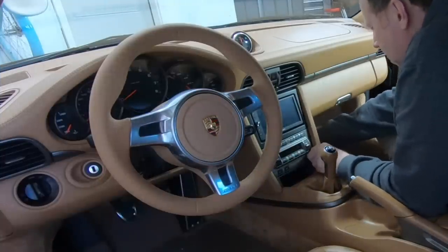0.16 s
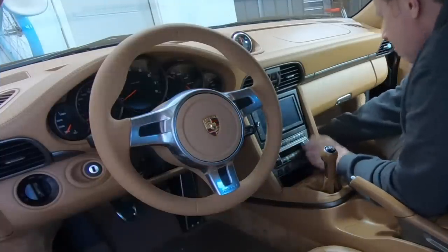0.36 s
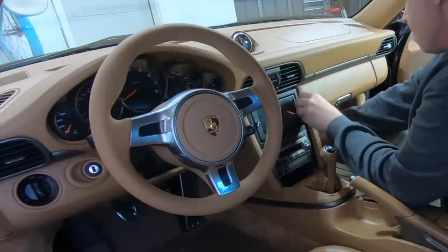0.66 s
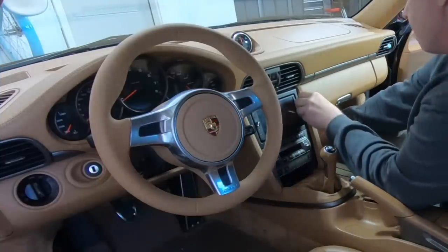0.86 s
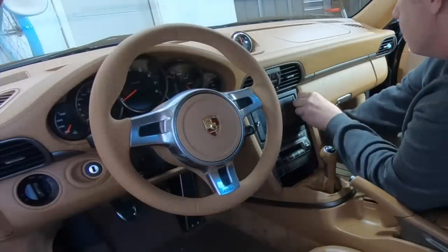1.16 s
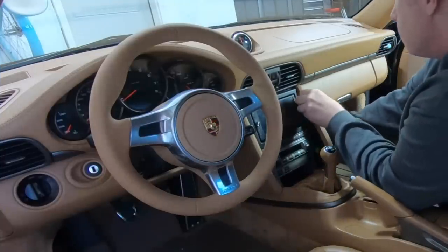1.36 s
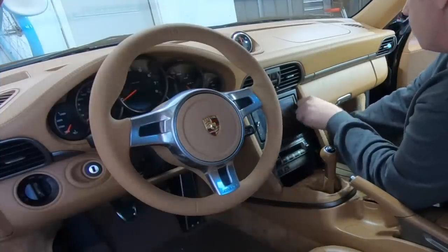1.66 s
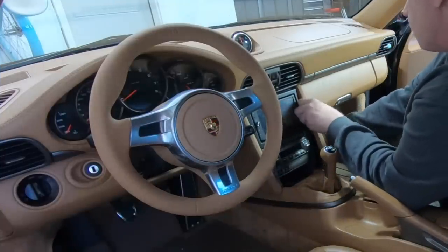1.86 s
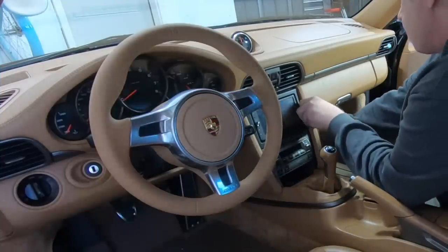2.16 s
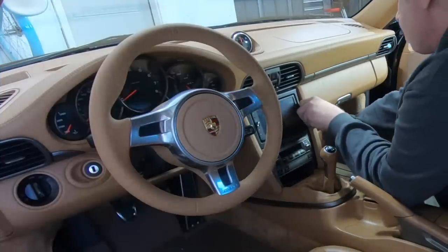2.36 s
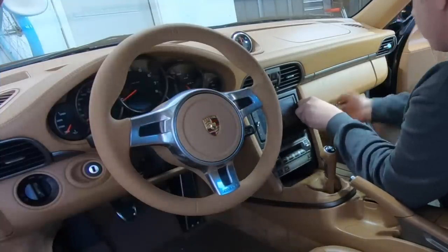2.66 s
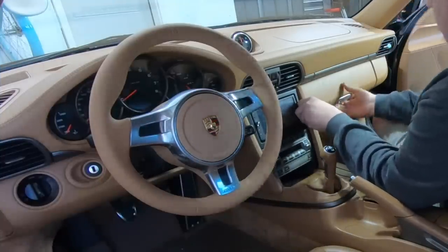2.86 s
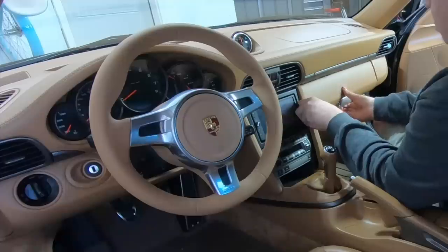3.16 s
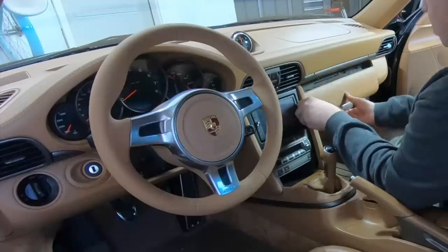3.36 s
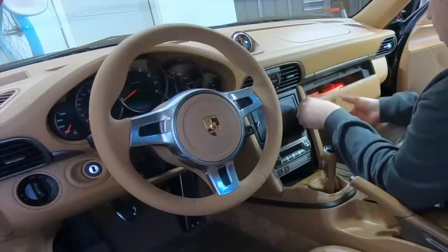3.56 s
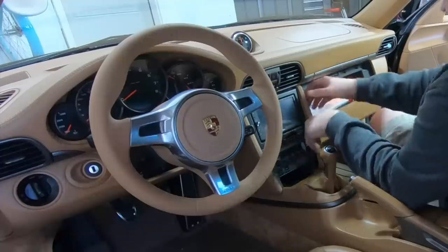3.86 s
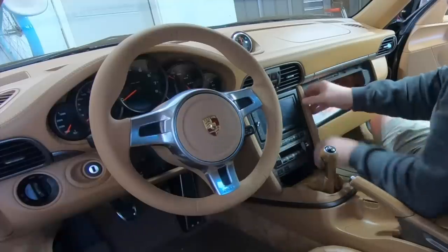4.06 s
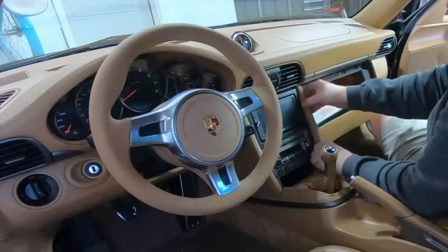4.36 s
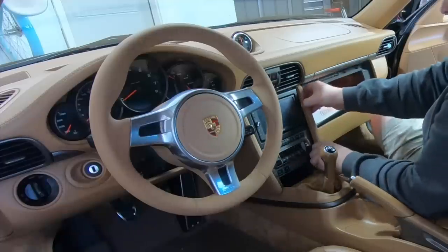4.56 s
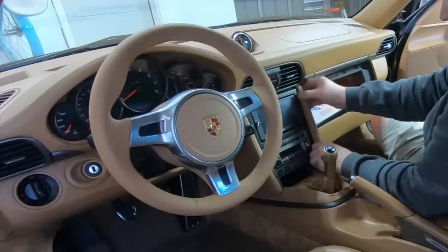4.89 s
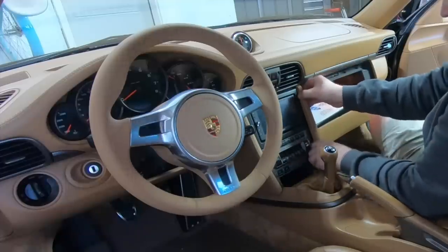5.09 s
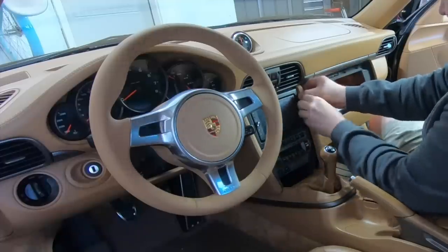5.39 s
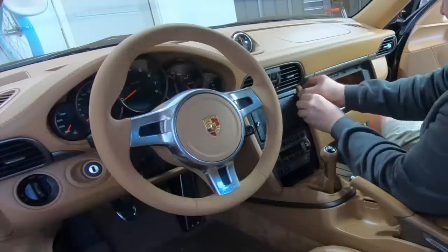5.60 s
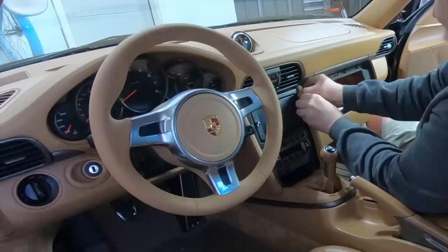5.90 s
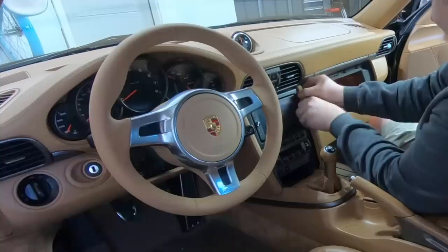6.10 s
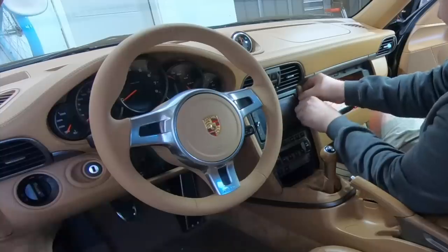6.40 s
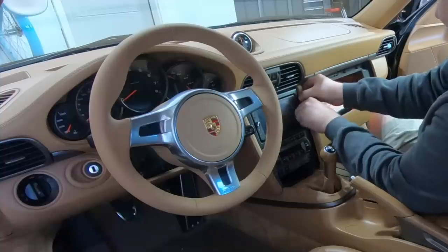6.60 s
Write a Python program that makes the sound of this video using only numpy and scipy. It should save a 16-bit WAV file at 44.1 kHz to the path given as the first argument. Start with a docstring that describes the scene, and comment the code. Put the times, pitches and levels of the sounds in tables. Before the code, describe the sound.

Clips crack and thud as hands work a car's dashboard panel loose, over low wobbling mount rumble, with echoes in a garage.

```python
"""Hands pry a plastic trim panel loose inside a car parked in a garage, doors open. First the camera
mount shivers on its spring, a wavering tone near 70 Hz mostly at right, and single clips knock and crack
(noise bursts through resonances). A flurry of snaps and creaks (stick-slip clicks) follows at 1.1-1.3 s,
the heaviest snap at 3.4 s, lighter clicks and rubs to the end. Throughout, sleeves hiss, shoves ring the
dashboard, the car rocks (low noise), still air murmurs, and the garage echoes (sparse decaying taps)."""
import sys
import numpy as np
from scipy import signal
from scipy.fft import rfft, irfft, next_fast_len
from scipy.io import wavfile
from scipy.ndimage import uniform_filter1d

SR = 44100
rng = np.random.default_rng(int(sys.argv[2]) if len(sys.argv) > 2 else 0)


def transcribe(signal):
    """Save signal, clipped to [-1, 1], as a 16-bit WAV file at the path in sys.argv[1]."""
    frames = np.atleast_2d(signal).T
    limited = np.clip(frames, -1, 1)
    pcm = np.round(limited * 32767).astype(np.int16)
    wavfile.write(sys.argv[1], SR, pcm)


def convert_level_to_amplitude(level_db):
    """Map a level in decibels to its linear amplitude factor."""
    exponent = np.asarray(level_db, float) / 20
    return 10 ** exponent


N = 297234

# clips and knocks: (time [s], knock level [dB], crack level [dB], knock pitch [Hz], left over right [dB])
CLIP_SNAPS = [(0.099, -27, -28.5, 1564, -1), (0.322, -42.5, -55.5, 1655, 0), (0.412, -38.5, -67.5, 634, 4),
              (0.654, -44.5, -50.5, 1400, -5), (0.727, -35, -43, 654, -5), (0.987, -51, -78, 706, -7),
              (1.116, -27, -44, 557, -3), (1.137, -17, -26, 464, 2.5), (1.283, -28, -25.5, 2470, -19.5),
              (1.29, -24.5, -21.5, 458, 26), (1.306, -18.5, -16.5, 686, -15), (1.315, -26, -36, 2350, 9),
              (1.72, -44, -41, 3120, 0), (1.841, -42, -72, 485, 0), (1.897, -58, -54, 510, -16),
              (1.922, -51, -48.5, 527, 9), (1.993, -33.5, -45.5, 737, -2.5), (2.108, -32, -45.5, 460, -0.5),
              (2.131, -48.5, -63, 2096, -4), (2.192, -46.5, -75, 1890, -4),
              (2.405, -43.5, -48.5, 1154, 2.5), (2.708, -40.5, -46.5, 1360, 1),
              (2.932, -38.5, -52.5, 1200, 2), (2.973, -38.5, -61.5, 530, -1), (3.158, -69.5, -50.5, 886, 1),
              (3.247, -68.5, -57.5, 896, 1), (3.264, -58, -52.5, 468, -1), (3.279, -71, -54, 901.7, -1),
              (3.289, -76.5, -48.5, 896, 1), (3.309, -69, -50.5, 891, -4), (3.325, -28, -46.5, 470, -1.5),
              (3.395, -33.5, -42, 1300, 0), (3.41, -5, -5.5, 1252, -1), (3.415, -4.5, -38.5, 635, -3.5),
              (3.873, -25.5, -33, 3400, -4), (4.097, -47.5, -57, 644, -19),
              (4.256, -50, -51.5, 482.4, -1.5), (4.498, -57.5, -54.5, 425, 1),
              (4.72, -45.5, -40.5, 3280, 11), (5.235, -44.5, -62, 914, -8), (5.59, -52, -65.5, 2200, -8),
              (5.616, -44, -45, 3220, 0.5), (5.687, -57.5, -71, 3150, -3), (5.696, -55, -68, 3170, 1.5),
              (5.703, -49, -58, 3080, -4.5), (5.714, -60, -68, 3230, 1), (6.049, -41.5, -47.5, 1486, 0),
              (6.073, -37.5, -64, 845, 0), (6.136, -66, -48.5, 1640, -7), (6.153, -41, -47, 1495, -1),
              (6.172, -44, -43, 3000, -5), (6.227, -40, -53, 1320, 4), (6.24, -38, -51, 2050, 1.5),
              (6.257, -52, -56, 2340, 0), (6.389, -41, -52, 3100, -2.5), (6.446, -42, -61, 1057, 4),
              (6.522, -50, -55, 1460, 2), (6.561, -30, -32, 3820, 3.5), (6.568, -35, -44, 1336, 10),
              (6.617, -54, -50, 700, 0)]
# resonances of the dashboard shell: (pitch [Hz], width [Hz], level [dB])
DASHBOARD_MODES = [(101, 49, 8.5), (191.4, 64, 4.5), (236.4, 17, 5.5), (455, 120, -11)]
# resonances of the trim panel: (pitch [Hz], width [Hz], level [dB])
PANEL_MODES = [(544, 380, 3.5), (1004, 460, -1), (1233, 150, 6.5), (2030, 1000, -4.5), (2550, 730, -0.5),
               (3400, 860, -8.5), (6000, 1500, -8), (7800, 550, -5)]
# colour of a clip's crack: (frequency [Hz], level per Hz [dB])
CRACK_COLOUR = [(180, -25), (300, 15), (970, -1.5), (1290, -19), (2800, -7), (3300, -20), (3640, -11.5),
                (4200, -16), (5000, -14.5), (6300, -8), (7200, -18), (9000, -24.5), (15600, -57)]
# colour of sliding cloth: (frequency [Hz], level per Hz [dB])
CLOTH_COLOUR = [(1470, -27), (2500, -8.5), (3610, -13.5), (6110, -11.5), (6850, -7.5), (8950, -24.5),
                (13400, -30.5), (15500, -36.5)]
# colour of the still air: (frequency [Hz], level per Hz [dB])
AIR_COLOUR = [(18, -27.5), (30, -10.5), (77, -23), (123, -12.5), (187, -23.5), (546, -35), (728, -27.5),
              (2690, -49), (6540, -48), (12300, -56.5), (15500, -79)]
# likeness of left and right in hiss and air: (frequency [Hz], likeness [0-1])
LIKENESS = [(60, 0.21), (300, 0.26), (500, 0.21), (1000, 0.069), (3500, 0.28), (8000, 0.36)]
# decay of the garage tail: (frequency [Hz], time to fall 60 dB [s])
GARAGE_DECAY = [(150, 1), (400, 0.56), (1000, 1.14), (2800, 0.99), (5500, 0.69), (8000, 0.49),
                (14000, 0.57)]
# colour of the garage tail: (frequency [Hz], level per Hz [dB])
ECHO_COLOUR = [(150, -40), (250, -7.5), (507, -12), (590, -6), (760, -5), (1000, -10.5), (1250, -9),
               (1500, -5.5), (1700, -9), (1950, -9.5), (2500, -10.5), (3500, -14), (4000, -20),
               (4550, -21.5), (6310, -14), (7900, -14), (15500, -55)]
# notes that stand out in the garage tail: (pitch [Hz], width [Hz], level [dB])
HOLLOW_NOTES = [(600, 80, -3), (1190, 64, -4.5), (1380, 60, -1.5), (1790, 150, -0.5)]
# twangs of a sprung clip, heard as notes in the garage tail: (time [s], level [dB], pitch [Hz])
CLIP_TWANGS = [(1.301, -30.5, 4550), (2.42, -58.5, 1250), (6.569, -55.5, 1354)]
# rubs of plastic on plastic: (full from [s], hold [s], level [dB], centre of colour [Hz])
PANEL_RUBS = [(0.09, 0.0062, -49.5, 1530), (0.322, 0.058, -58, 1550), (0.402, 0.028, -48, 627),
              (0.662, 0.011, -55.5, 1250), (0.725, 0.008, -49, 574), (0.992, 0.0094, -53.5, 770),
              (1.093, 0.017, -45.5, 500), (1.14, 0.0038, -67, 660), (1.26, 0.013, -35, 800),
              (1.282, 0.042, -29, 410), (1.714, 0.026, -50.5, 6600), (1.924, 0.019, -35.5, 497),
              (1.99, 0.032, -43, 1080), (2.045, 0.088, -42.5, 518), (2.371, 0.0091, -57, 826),
              (2.413, 0.024, -49, 1140), (2.931, 0.011, -56.5, 2320), (2.935, 0.01, -49, 980),
              (2.972, 0.0056, -45, 518), (3.086, 0.015, -62, 648), (3.261, 0.036, -53.5, 600),
              (3.415, 0.02, -23.5, 402.4), (3.87, 0.017, -50.5, 493), (3.937, 0.054, -50.5, 700),
              (4.083, 0.0096, -57, 1190), (4.731, 0.065, -62.5, 1591), (5.084, 0.0061, -60, 523),
              (5.237, 0.025, -52.5, 1050), (5.36, 0.062, -55.5, 608), (5.529, 0.027, -53, 690),
              (5.601, 0.051, -46.5, 740), (5.632, 0.024, -52.5, 674), (5.657, 0.03, -48.5, 424),
              (5.685, 0.029, -40.5, 625), (6.02, 0.024, -59.5, 6000), (6.137, 0.11, -60, 6100),
              (6.025, 0.027, -58, 1330), (6.048, 0.019, -55.5, 2930), (6.144, 0.03, -53.5, 1510),
              (6.163, 0.046, -59, 3060), (6.17, 0.026, -60, 1302), (6.222, 0.02, -51, 590),
              (6.227, 0.018, -55, 2020), (6.395, 0.027, -54, 1482), (6.442, 0.0087, -52, 663)]
# sweeps of a sleeve: (full from [s], hold [s], level [dB])
SLEEVE_SWEEPS = [(.3, 0.4, -58), (.75, 0.13, -68), (1.275, .01, -52.5), (1.62, 0.023, -56.5),
                 (1.93, 0.13, -56), (2.55, 0.07, -62.5), (2.85, 0.29, -73.5), (3.28, 0.13, -63),
                 (3.92, 0.073, -53.5), (4.75, 0.014, -62), (5.3, 0.11, -59.5), (6.2, 0.023, -64.5),
                 (6.57, 0.058, -60.5)]
# shivers of the camera mount: (full from [s], hold [s], level [dB], pitch [Hz])
MOUNT_SHIVERS = [(0.0, 0.071, -39, 65.2), (0.152, 0.014, -11, 72), (0.155, 0.085, -11.5, 74.22),
                 (0.331, 0.034, -37, 72.94), (0.477, 0.068, -22.5, 69.9), (0.682, 0.083, -26.5, 72.14),
                 (0.954, 0.0051, -33.5, 73.57), (1.15, 0.058, -35, 72.65), (1.24, 0.013, -24, 75.1),
                 (1.321, 0.14, -15, 71.6), (1.646, 0.08, -27, 72.25), (1.761, 0.068, -22.5, 71.6),
                 (1.986, 0.051, -15.5, 74.7), (2.059, 0.043, -10, 70.9), (2.136, 0.089, -14.5, 67.41),
                 (2.348, 0.0066, -32, 74.76), (2.476, 0.061, -38.5, 69.55), (2.717, 0.1, -33.5, 72.22),
                 (2.78, 0.029, -27, 72.74), (2.999, 0.077, -23.5, 70.74), (3.166, 0.006, -36.5, 70.45),
                 (3.318, 0.059, -10.5, 66.32), (3.4, 0.098, -14.5, 71.12), (3.594, 0.012, -41, 69.45),
                 (3.967, 0.025, -13.5, 67.31), (4.036, 0.03, -21.5, 75.7), (4.136, 0.037, -30, 73.9),
                 (4.284, 0.032, -49, 70.53), (4.431, 0.082, -37, 69.66), (4.554, 0.027, -40, 69.5),
                 (4.733, 0.074, -36, 72), (5.133, 0.018, -35.5, 65.6), (5.2, 0.0051, -30.5, 68.7),
                 (5.361, 0.039, -21, 69.53), (5.453, 0.028, -46, 74.16), (5.732, 0.014, -31, 72.06),
                 (5.888, 0.082, -25, 70.96), (6.077, 0.07, -42, 70.4), (6.158, 0.076, -33.5, 72.5),
                 (6.259, 0.014, -30.5, 72.1), (6.53, 0.081, -38.5, 70), (6.687, 0.027, -49, 71.6)]
# rocking of the car on its springs: (full from [s], hold [s], level [dB])
CAR_SWAYS = [(0.0, 0.011, -29), (.57, 0.16, -31.5), (.73, 0.0082, -27), (.9, 0.074, -34.5),
             (1.14, 0.0099, -28), (1.35, 0.057, -16.5), (1.68, 0.02, -29), (1.76, 0.023, -23.5),
             (1.93, 0.32, -26), (2.44, 0.065, -43), (2.72, 0.073, -28.5), (2.85, 0.0091, -36),
             (3.01, 0.058, -22.5), (3.33, 0.058, -30), (3.9, 0.2, -23), (4.2, 0.39, -35),
             (4.64, 0.096, -51), (5.46, 0.059, -37), (5.88, 0.16, -36), (6.2, 0.047, -47.5),
             (6.53, 0.04, -44)]
# shoves on the dashboard: (full from [s], hold [s], level [dB], pitch of the spot pushed [Hz])
DASHBOARD_SHOVES = [(0.113, 0.029, -30, 244.7), (0.429, 0.015, -35.5, 181.4), (0.554, 0.041, -45.5, 206),
                    (0.731, 0.013, -28, 216), (.95, 0.08, -50, 204.3), (1.122, 0.034, -20, 191.8),
                    (1.293, 0.06, -21.5, 248.7), (1.527, 0.22, -47.5, 215.6), (1.71, 0.17, -42, 170.4),
                    (1.928, 0.11, -30, 161.7), (2.102, 0.11, -34, 207), (2.363, 0.091, -51.5, 201),
                    (2.707, 0.051, -46, 180), (2.971, 0.059, -41, 233.3), (3.275, 0.068, -37.5, 132.2),
                    (3.411, 0.05, -20.5, 183.2), (3.896, 0.089, -37, 156.1), (4.09, 0.012, -39.5, 132.2),
                    (4.326, 0.16, -51, 167.5), (4.72, 0.041, -50.5, 161), (5.095, 0.039, -38, 212.8),
                    (5.208, 0.16, -44, 223.4), (5.54, 0.078, -39, 221.8), (5.631, 0.039, -37, 228),
                    (5.677, 0.014, -27.5, 230.8), (5.717, 0.0098, -25.5, 216.7), (5.782, 0.096, -43, 169),
                    (6.168, 0.022, -33.5, 204), (6.195, 0.036, -25, 231), (6.449, 0.011, -32.5, 198.8),
                    (6.568, 0.0072, -28.5, 223)]

# how fast each kind of gesture swells and dies
RUB_RISE_DB_PER_S, RUB_FALL_DB_PER_S = 1201, 420.5
SLEEVE_RISE_DB_PER_S, SLEEVE_FALL_DB_PER_S = 73.5, 57
SHOVE_RISE_DB_PER_S, SHOVE_FALL_DB_PER_S = 992, 270
SHIVER_RISE_DB_PER_S, SHIVER_FALL_DB_PER_S = 456, 303
SWAY_RISE_DB_PER_S, SWAY_FALL_DB_PER_S = 344, 192.5

CONTACT_HZ, HEAVY_DB, DULLING = 15900, -14, 0.28  # cracks above HEAVY_DB lose their top
TWANG_T60_S = 0.016
RUB_WIDTH_HZ, RUB_WIDENING, RUB_PANEL_DB = 300, 0.41, -17.5  # higher spots ring wider
SPOT_DB, SPOT_WIDTH_HZ = -4, 7.5
# the shell hums on after a shove, and under resting hands
LINGER_DB, LINGER_FALL_DB_PER_S, RESTING_DB = -21.5, 82, -56.5
AIR_DB = -52.5


def snaps():
    """Each snap is a sudden noise burst: a knock at the struck spot's pitch, the panel, and the bare crack."""
    t = np.arange(SR // 10) / SR
    bursts = rng.standard_normal((len(CLIP_SNAPS), 3, len(t)))
    out = np.zeros((2, N + len(t)))
    high = signal.butter(2, 2500, "high", fs=SR, output="sos")
    blow_decay = convert_level_to_amplitude(-60 * np.maximum(t - 0.004, 0) / 0.032)
    tick_decay = convert_level_to_amplitude(-60 * np.maximum(t - 0.0025, 0) / 0.017)
    for burst, (s, knock_db, crack_db, hz, pan_db) in zip(bursts, CLIP_SNAPS):
        # partly alike at the two ports
        both = (0.95 * burst[0] + 0.7 * burst[1:]) * np.minimum(t / 0.00085, 1)
        blow = dull(both, 4500) * blow_decay
        # the treble differs more between ports
        tick = (both + 0.73 * burst[1:]) * tick_decay

        spot = resonate(blow, hz, hz * (0.023 + 0.029 * hz / 1000))
        knock = convert_level_to_amplitude(12.0) * spot + convert_level_to_amplitude(5.0) * ring(blow, PANEL_MODES[:6])
        panel_top = dull(ring(tick, PANEL_MODES[5:]), 13000)
        crack = convert_level_to_amplitude(13.0) * signal.sosfilt(high, colour(tick, CRACK_COLOUR) + 0.18 * panel_top)
        snap = convert_level_to_amplitude(knock_db) * knock + convert_level_to_amplitude(crack_db) * contact(crack, crack_db)

        side = convert_level_to_amplitude(np.array([[pan_db], [-pan_db]]) / 2)
        start = round(s * SR)
        out[:, start:start + len(t)] += side * snap
    return out[:, :N]


def contact(x, crack_db):
    """A heavy blow stays longer in contact, so its top end is softer."""
    excess_db = max(crack_db - HEAVY_DB, 0)
    return dull(x, min(CONTACT_HZ * convert_level_to_amplitude(-DULLING * excess_db), SR / 2.2))


def creak():
    """Stick-slip clicks and scrape excite the panel and the spot under the fingers."""
    grit = dull(slips(1100, 3.5) + 0.4 * rng.standard_normal((2, N)), 3500)
    out = np.zeros((2, N))
    for row in PANEL_RUBS:
        start, _, _, hz = row
        at = np.arange(round((start - 0.06) * SR), min(round((start + 0.35) * SR), N))
        width = RUB_WIDTH_HZ + RUB_WIDENING * hz
        spot = resonate(resonate(grit[:, at], hz, width), hz, width)
        rub = spot + convert_level_to_amplitude(RUB_PANEL_DB) * ring(grit[:, at], PANEL_MODES[:6])
        out[:, at] += evened(rub) * gestures([row], RUB_RISE_DB_PER_S, RUB_FALL_DB_PER_S)[at]
    return out


def slips(per_s, spread_db):
    """Stick-slip clicks at random moments, a few of them large."""
    size = convert_level_to_amplitude(spread_db * np.minimum(rng.exponential(1, N), 4))
    signed = size * rng.choice([-1., 1.], N)
    return evened(signed * (rng.random(N) < per_s / SR))


def mount():
    """A near-pure shiver with a trace of overtone; the left port gets little, in a wandering phase."""
    s, hold, _, hz = np.transpose(MOUNT_SHIVERS)
    pitch = np.interp(np.arange(N) / SR, s + hold / 2, hz)
    turn = 2 * np.pi * np.cumsum(pitch) / SR
    slow = signal.butter(2, 4, fs=SR, output="sos")
    drift = 1.2 * evened(signal.sosfilt(slow, rng.standard_normal(N)))
    left = convert_level_to_amplitude(-8.5) * np.cos(turn + 1.6 + drift)
    right = convert_level_to_amplitude(8.5) * (np.cos(turn) + 0.058 * np.cos(2 * turn))
    level = gestures(MOUNT_SHIVERS, SHIVER_RISE_DB_PER_S, SHIVER_FALL_DB_PER_S)
    return np.sqrt(2) * level * np.array([left, right])


def shoves():
    """Rough pushes ring the dashboard shell and the spot pushed, stronger at the right port."""
    push = 0.6 * slips(250, 2.7) + rng.standard_normal((2, N))
    s, _, _, hz = np.transpose(DASHBOARD_SHOVES)
    # the pitch moves to each new spot 20 ms ahead of its shove
    latest = np.maximum(np.searchsorted(s, np.arange(N) / SR + 0.02) - 1, 0)
    shell = evened(ring(ring(push, DASHBOARD_MODES), [(180, 204, 0)]))
    spot = evened(resonate(resonate(push, hz[latest], SPOT_WIDTH_HZ), 200, 340))
    body = shell + convert_level_to_amplitude(SPOT_DB) * spot
    level = gestures(DASHBOARD_SHOVES, SHOVE_RISE_DB_PER_S, SHOVE_FALL_DB_PER_S) + convert_level_to_amplitude(RESTING_DB)
    level += convert_level_to_amplitude(LINGER_DB) * gestures(DASHBOARD_SHOVES, SHOVE_RISE_DB_PER_S, LINGER_FALL_DB_PER_S)
    return body * level * convert_level_to_amplitude([[-1], [4.5]])


def sway():
    """The car rocks on its springs: lumpy noise below the mount's note, mostly at right."""
    band = signal.butter(3, [22, 50], "band", fs=SR, output="sos")
    low = evened(signal.sosfilt(band, rng.standard_normal((2, N))))
    return low * gestures(CAR_SWAYS, SWAY_RISE_DB_PER_S, SWAY_FALL_DB_PER_S) * convert_level_to_amplitude([[-11], [5.5]])


def sleeves():
    """Cloth and fingertips slide: patchy hiss."""
    hiss = evened(colour(pair(flicker_db=3.0), CLOTH_COLOUR))
    return hiss * gestures(SLEEVE_SWEEPS, SLEEVE_RISE_DB_PER_S, SLEEVE_FALL_DB_PER_S)


def cabin(airborne):
    """The small interior answers within milliseconds with a short, bright tail."""
    return convert_level_to_amplitude(-3.5) * space(airborne, 0.2, [(300, 0.08), (8000, 0.14)], 0.0012, 0.24)


def garage(rubs):
    """Far walls return each snap as a click plus its pitch; of the rubs only the upper part travels."""
    t = np.arange(SR // 20) / SR
    low, top, pitched = np.zeros((3, N + len(t)))
    for s, knock_db, crack_db, hz, _ in CLIP_SNAPS:
        at = round(s * SR)
        low[at] += convert_level_to_amplitude(knock_db)
        top[at:at + len(t)] += convert_level_to_amplitude(crack_db + 5.5) * contact(t == 0, crack_db)
        pitched[at:at + len(t)] += convert_level_to_amplitude(knock_db - 60 * t / 0.025) * np.sin(2 * np.pi * hz * t)
    sent = dull(low, 3100) + top - dull(top, 4500) + 0.039 * dull(pitched, 2200)
    for s, db, hz in CLIP_TWANGS:
        sent[round(s * SR):][:len(t)] += convert_level_to_amplitude(db - 60 * t / TWANG_T60_S) * np.sin(2 * np.pi * hz * t)

    snap_tail = space(sent[:N], 1.5, GARAGE_DECAY, 0.008, 0.1, patchy_db=1.5)
    snap_tail = convert_level_to_amplitude(29.0) * colour(snap_tail, ECHO_COLOUR)
    hollow = sum(convert_level_to_amplitude(db) * resonate(snap_tail, hz, width) for hz, width, db in HOLLOW_NOTES)
    high = signal.butter(2, 1000, "high", fs=SR, output="sos")
    rub_tail = space(signal.sosfilt(high, rubs.mean(0)), 1.6, GARAGE_DECAY, 0.007, 0.1)
    return snap_tail + hollow + convert_level_to_amplitude(-8.5) * rub_tail


def still_air():
    """The air of the place: steady, mostly low noise with small patches of level."""
    return convert_level_to_amplitude(AIR_DB) * evened(colour(pair(flicker_db=2.6), AIR_COLOUR))


def space(x, length_s, decay, start_s, alike, patchy_db=0):
    """Echo of sparse random-sign taps, each band dying at its own speed; patchy_db makes it uneven."""
    size, first = int(length_s * SR), int(start_s * SR)
    taps = np.zeros((2, size))
    at = np.arange(first, size - 20, 20)  # one tap in every 20 samples
    at = at + rng.integers(0, 20, (2, len(at)))
    np.put_along_axis(taps, at, rng.choice([-1., 1.], at.shape), 1)
    hz, t, z = signal.stft(taps, SR, nperseg=256)
    patches = uniform_filter1d(rng.standard_normal((len(t), len(hz))), size=8, axis=0)
    patches = evened(uniform_filter1d(patches, size=3, axis=1))
    fade_db = -60 * t / read(decay, hz)[:, None]
    tail = signal.istft(z * convert_level_to_amplitude(fade_db + patchy_db * patches.T), SR, nperseg=256)[1]
    tail = tail + alike * tail[::-1]  # each port shares some of the other's
    return signal.fftconvolve(x[None], tail / np.linalg.norm(tail[0]), axes=1)[:, :N]


def pair(flicker_db=0.):
    """Stereo noise, partly alike left and right, with short patches of level."""
    frames, hz = N // 128 + 5, np.fft.rfftfreq(512, 1 / SR)
    a, b, c, d, patches = rng.standard_normal((frames, 257, 5)).T
    patches = evened(uniform_filter1d(uniform_filter1d(patches, 20, 0), 10, 1))
    same = np.clip(read(LIKENESS, hz), -1, 1)[:, None]
    left = a + 1j * b
    right = same * left + np.sqrt(1 - same ** 2) * (c + 1j * d)
    z = np.array([left, right]) * convert_level_to_amplitude(flicker_db * patches)
    return evened(signal.istft(z, nperseg=512, noverlap=384)[1][:, :N])


def ring(x, modes):
    """Sum of two-pole resonances of alternating sign, each with its gain at the peak."""
    out = np.zeros(x.shape)
    for k, (hz, width, db) in enumerate(modes):
        out += (-1) ** k * convert_level_to_amplitude(db) * signal.lfilter(*signal.iirpeak(hz, hz / width, SR), x)
    return out


def resonate(x, hz, width):
    """Shifts the curve hz down to zero, smooths, and shifts back: a resonance that can move."""
    turn = np.exp(2j * np.pi * np.cumsum(hz * np.ones(x.shape[-1])) / SR)
    r = np.exp(-np.pi * width / SR)
    return 2 * (turn * signal.lfilter([1 - r], [1, -r], x / turn)).real


def dull(x, hz):
    """Soft contact: the treble falls away steeply above hz."""
    return signal.sosfilt(signal.butter(3, hz, fs=SR, output="sos"), x)


def colour(x, points):
    """Filters by a spectrum in dB."""
    size = next_fast_len(x.shape[-1])
    gain = convert_level_to_amplitude(read(points, np.fft.rfftfreq(size, 1 / SR)))
    return irfft(rfft(x, size) * gain, size)[..., :x.shape[-1]]


def read(points, hz):
    """Reads a spectrum on a log-frequency axis."""
    f, value = np.transpose(points)
    return np.interp(np.log(hz + 1), np.log(f + 1), value)


def evened(x):
    """Scales to rms 1."""
    return x / np.sqrt(np.mean(x ** 2) + 1e-20)


def swell(row, rise_db, fall_db):
    """One gesture: the level climbs to full at rise_db a second, holds, then drops at fall_db a second."""
    t = np.arange(0, N, 64) / SR - row[0]
    return convert_level_to_amplitude(row[2] + rise_db * np.minimum(t, 0) - fall_db * np.maximum(t - abs(row[1]), 0))


def gestures(rows, rise_db, fall_db):
    """All gestures of a table, the loudest leading, at every sample."""
    level = np.max([swell(row, rise_db, fall_db) for row in rows], axis=0)
    return np.interp(np.arange(N), np.arange(0, N, 64), level)


def scene():
    """Snaps and rubs get the short cabin and the long garage; shocks through the body stay dry."""
    clips, rubs = snaps(), creak()
    airborne = (clips + 0.11 * rubs).mean(0)  # much of a rub comes through the dashboard, not the air
    echoes = cabin(airborne) + garage(rubs)
    return clips + rubs + echoes + sleeves() + shoves() + mount() + sway() + still_air()


def band_limit(x):
    """A steep low-pass at the top of the band."""
    return signal.sosfilt(signal.butter(12, 15760, fs=SR, output="sos"), x)


def record(dry):
    """Gain control ducks under loud shocks and recovers slowly; then soft overload and a band limit."""
    power_db = 10 * np.log10(abs(uniform_filter1d((dry ** 2).mean(0), 900)) + 1e-12)
    fall = np.arange(N) * 25.0 / SR  # the held peak falls 25 dB a second
    held_db = np.maximum.accumulate(power_db + fall) - fall
    over_db = np.maximum(held_db + 16.5, 0)
    ducked = dry / convert_level_to_amplitude(0.25 * uniform_filter1d(over_db, 300))
    overloaded = 1.187 * np.tanh(ducked / 1.41)
    edge = signal.firwin(255, 15550, window=("kaiser", 8), fs=SR)
    limited = signal.oaconvolve(overloaded, edge[None], "same")
    return band_limit(limited)


dry = scene()
out = record(dry)
transcribe(out)
```